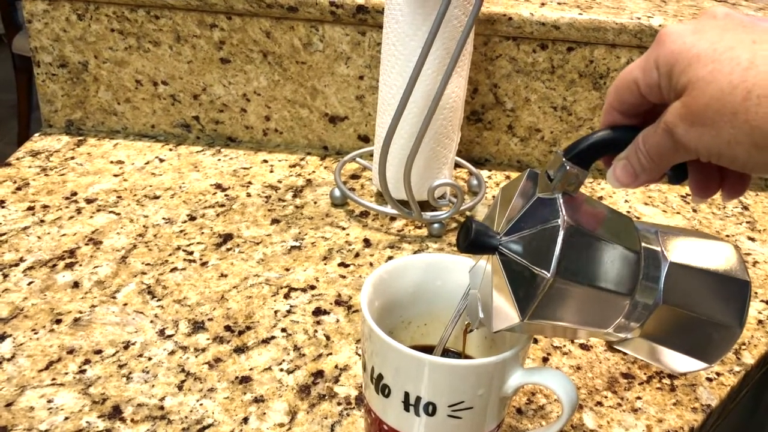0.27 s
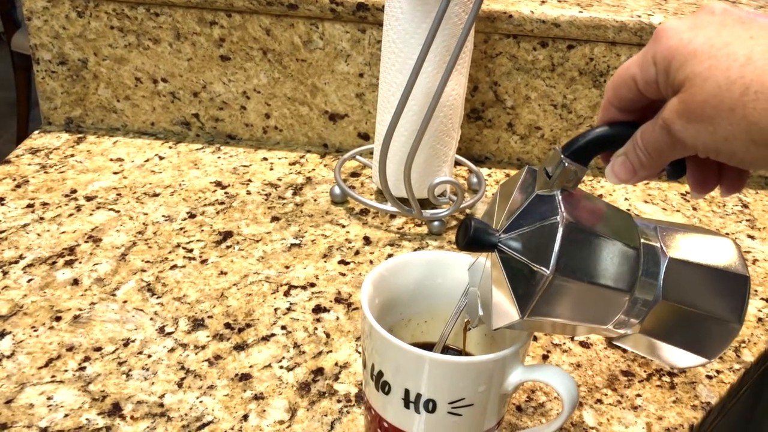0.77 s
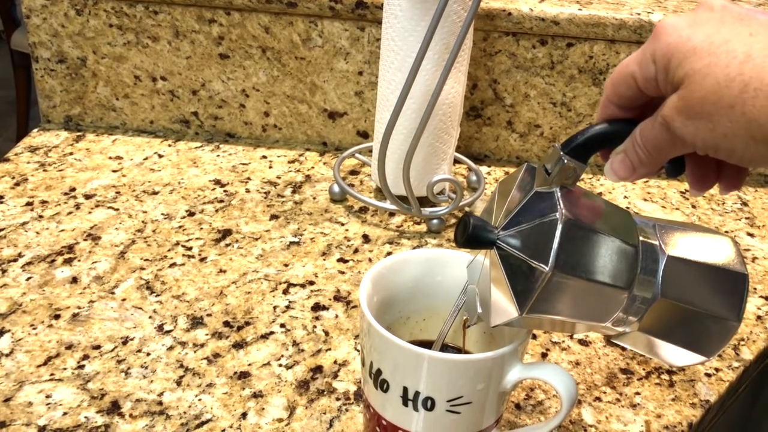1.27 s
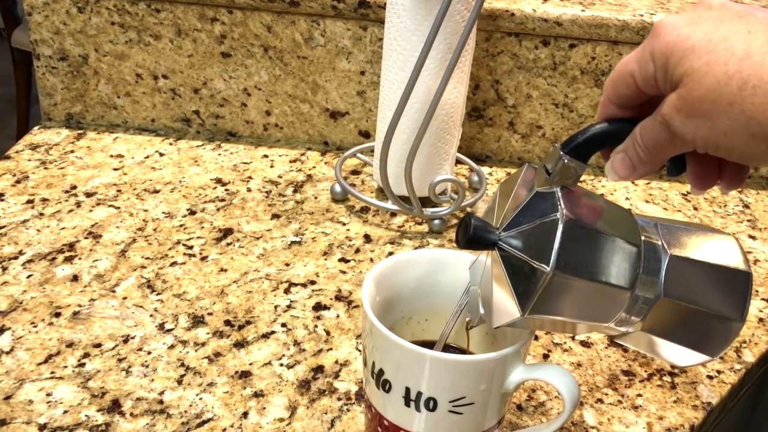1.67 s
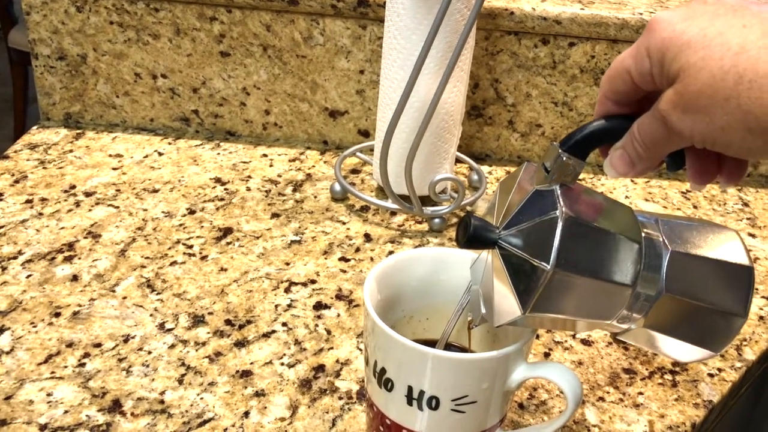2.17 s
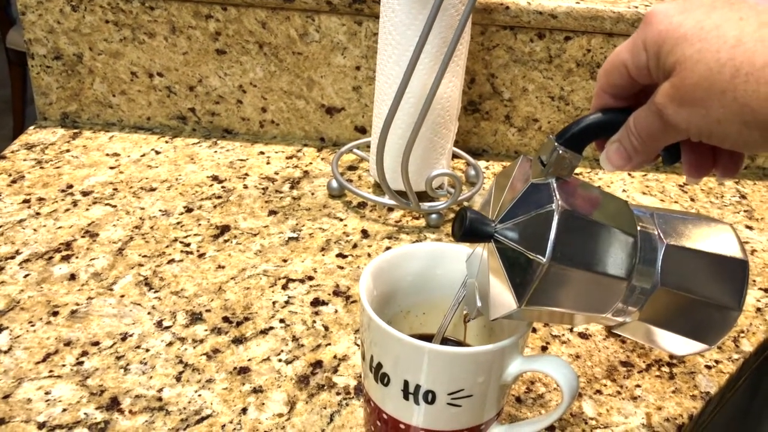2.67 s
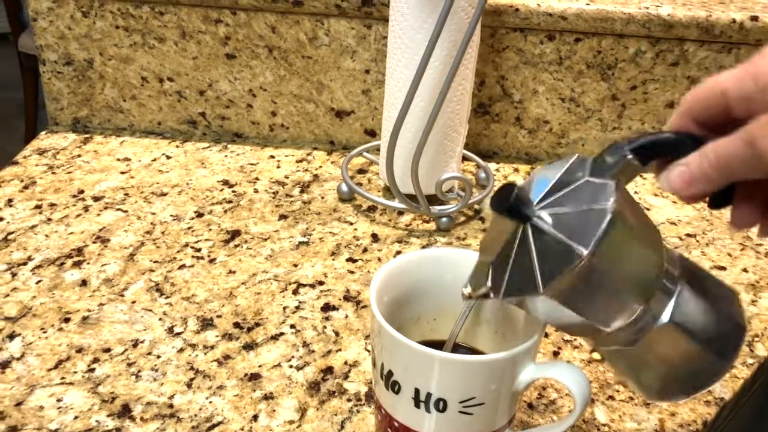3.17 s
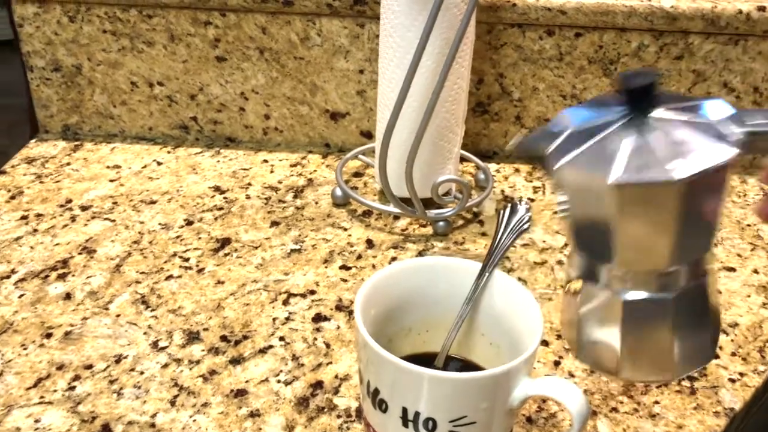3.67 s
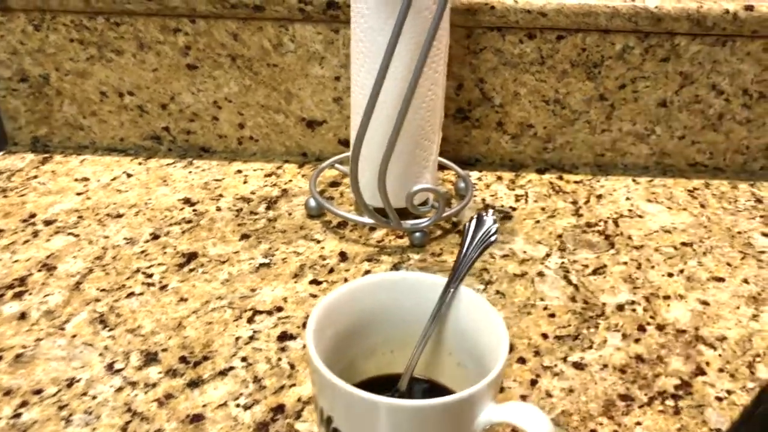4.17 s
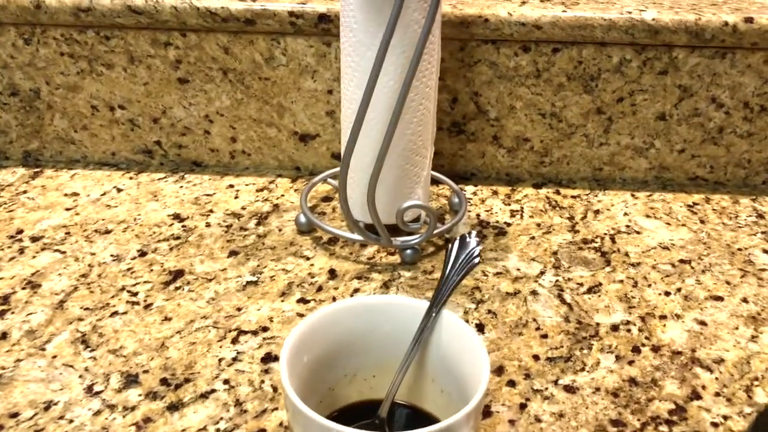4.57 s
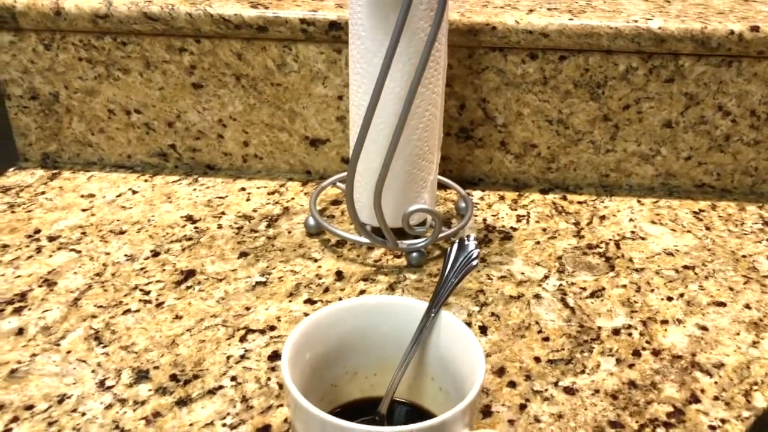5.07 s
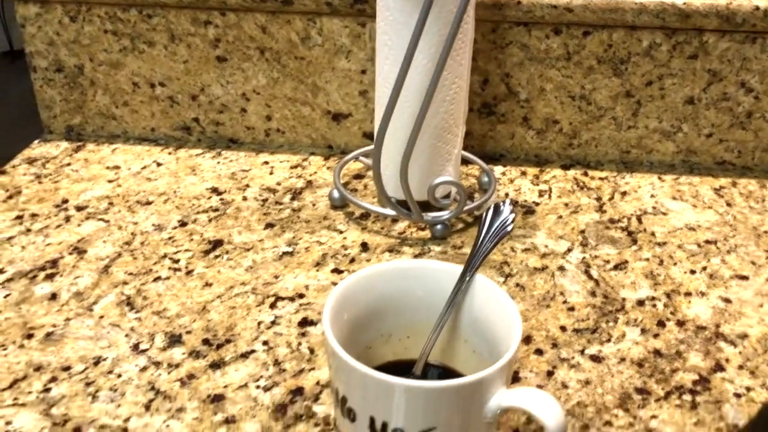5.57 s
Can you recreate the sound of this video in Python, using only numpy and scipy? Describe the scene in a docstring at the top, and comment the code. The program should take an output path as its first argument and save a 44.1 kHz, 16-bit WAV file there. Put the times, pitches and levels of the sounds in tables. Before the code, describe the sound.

Coffee trickles and plinks into a ceramic mug with sharp spits, a spoon clinks twice, then a tap spurts and a metal pot clacks down in a sink.

```python
"""Coffee drops plink into a ceramic mug and spit sharply on a hot metal spout, over a kitchen's low hum.
Bubbles ring at a rising pitch in the mug, and vapour bursts are short runs of ticks. The pour ends, the
pot is lifted away with light bumps, and the spoon in the mug shifts twice, ringing the ceramic modes.
A tap spurts into the sink and runs as shaped noise; the pot is set down there with a clack, its body and
the basin ringing as decaying sines, while the jet hisses on it. The hum swells from late in the pour on."""
import sys
import numpy as np
from scipy import signal
from scipy.fft import rfft, irfft, next_fast_len
from scipy.io import wavfile

SR = 44100
rng = np.random.default_rng(int(sys.argv[2]) if len(sys.argv) > 2 else 0)


def unload_wav(signal):
    """Save mono or channel-first audio to the path in sys.argv[1] as 16-bit WAV at rate SR, clipped to [-1, 1]."""
    wavfile.write(
        sys.argv[1],
        SR,
        np.round(np.clip(np.atleast_2d(signal).T, -1, 1) * 32767).astype(np.int16),
    )


N = 256220
TIME = np.arange(N) / SR

# All levels are relative. A colour is a noise spectrum; its level is a density.

# larger drops in the mug: (t/s, bubble f/Hz, bubble level/dB, splash level/dB)
DROPS = [(0.0418, 2080, -49, -53), (.138, 2100, -55.5, -56), (0.2407, 1980, -45, -35),
         (.278, 2490, -37, -46), (.3002, 3760, -43.5, -47.5), (.33, 2130, -51, -48),
         (.3683, 2390, -41, -51), (0.4232, 2470, -42.5, -54), (.4609, 2650, -48.5, -49),
         (0.4976, 2060, -54, -43), (.567, 2100, -50.5, -50), (0.6099, 1730, -42.5, -55),
         (.6668, 1970, -43.5, -42), (0.6825, 2130, -56, -50), (.9026, 2080, -50.5, -53),
         (0.9137, 2260, -49.5, -41), (.9467, 2120, -51.5, -54), (0.985, 2600, -46, -53.5),
         (.9956, 2620, -41.5, -54), (1.046, 2170, -53.5, -49), (1.0748, 2640, -42.5, -46),
         (1.1437, 2100, -48, -51), (1.155, 2130, -62, -46.5), (1.255, 2130, -61, -53),
         (1.275, 2440, -53.5, -41), (1.483, 4120, -54, -53.5), (1.7945, 1960, -73, -49.5),
         (1.8045, 4090, -59, -46.5), (1.9038, 4100, -60, -51.5), (1.915, 3830, -49, -52),
         (1.9607, 2260, -44, -49), (2.0662, 2500, -41, -54), (2.1208, 2400, -39, -48),
         (2.1527, 3670, -53, -58), (2.2034, 2520, -43.5, -53), (2.2112, 2410, -50, -54),
         (2.2905, 3770, -47, -50.5), (2.4755, 2590, -43.5, -50)]
# slap of a drop on the surface: (f/Hz, level/dB)
SPLASH_COLOUR = [(1200, -5), (2100, -10), (2700, -16), (3200, -8), (3900, 4), (4800, -8.5), (7100, 2.5),
                 (8200, -5.5), (9300, 2), (11000, -1.5), (12000, -9), (15500, -2.5)]
# air cavity of the mug: (f/Hz, level/dB, t60/s)
CAVITY_MODES = [(2060, -10.5, 0.016), (2650, -9.5, 0.04)]
DROPLET_HZ = 7150  # mean ping of the tiny bubble that each slap leaves
POUR_S = 2.9  # the stream runs until then
# surges of the stream churn the coffee: (t/s, time from onset to fade/s, level/dB)
SURGES = [(0, 0.58, -59), (1.078, 0.19, -64), (2.51, 0.19, -59.5)]
WASH_COLOUR = [(60, -17), (100, 4.5), (150, -8.5), (300, 2), (450, -4.5), (650, -25)]  # churning coffee: (f/Hz, level/dB)
SURGE_RISE_S, SURGE_FADE_DB_PER_S = 0.079, 49

# coffee wets the hot spout and boils: (t/s, time from onset to fade/s, level/dB, tick rate/Hz, fade/dB per s)
SIZZLES = [(0.073, 0.12, -56.5, 125, 260), (0.266, 0.28, -55, 335, 280), (2.363, 0.068, -52, 310, 900),
           (2.453, 0.092, -53, 280, 300), (2.573, 0.14, -59, 360, 170)]
# sharp spits on the hot metal: (t/s, peak level/dB)
SPITS = [(.036, -29), (.060, -19.5), (.099, -24.5), (.109, -25), (.134, -28), (.151, -28), (.176, -18),
         (.237, -31), (.349, -27), (.510, -21.5), (.663, -33), (2.372, -29.5), (2.427, -21.5), (2.434, -31),
         (2.465, -26), (2.485, -17), (2.547, -27.5)]
# short puffs of steam: (t/s, level/dB, length/s)
PUFFS = [(0.039, -50.5, 0.029), (0.165, -47, 0.016), (2.479, -45, 0.011)]
# ring of a sizzle tick, then of a spit: (f/Hz, level/dB, t60/s)
TICK_MODES = [(2600, -16.5, 0.0018), (6900, -7.5, 0.0019), (12250, 1, 0.00096), (14300, 1.5, 0.0008)]
SPIT_MODES = [(2100, -19, 0.0048), (3430, -22, 0.0032), (6830, -8.5, 0.0012), (12400, -2.5, 0.00096),
              (14450, -1, 0.001)]
WETTING_S = 0.008  # rise of each sizzle

# light bumps of handling the pot: (t/s, level/dB, brightness/dB per octave, t60/s)
KNOCKS = [(3.015, -50.5, -1, 0.18), (3.044, -43, -2, 0.095), (3.062, -47, -1.5, 0.086),
          (5.197, -32, 2.5, 0.049), (5.249, -43.5, -3, 0.06)]
KNOCK_COLOUR = [(150, -10), (250, -1), (500, -11), (800, -7), (1100, -10.5), (1900, -13.5), (3000, -22),
                (5000, -25.5), (8500, -21.5), (14000, -43)]  # bump: (f/Hz, level/dB)
# resonances of the handled pot: (f/Hz, width/Hz, lift/dB)
KNOCK_PEAKS = [(900, 49, 14), (1310, 43, 3), (1490, 47, 6), (2248, 94, 13.5), (3730, 140, 6)]
# spoon against the mug: (t/s, ring level/dB, knock level/dB, brightness/dB per octave)
CLINKS = [(3.8364, -17.5, -25.5, 1.5), (3.852, -25, -34, -2.5), (3.857, -42, -37.5, -5),
          (4.361, -24, -32.5, 0)]
CLINK_COLOUR = [(200, -21), (390, -0.5), (600, -5), (750, -1.5), (1050, 4.5), (1280, -7), (1600, -2),
                (2100, -15), (3800, -7), (4730, -12.5), (6820, -14.5), (10200, -13), (11700, -26),
                (16000, -26)]  # contact noise of the spoon: (f/Hz, level/dB)
# mug and spoon: (f/Hz, level/dB, t60/s)
MUG_MODES = [(1020, -21.5, 0.069), (1570, -20, 0.052), (3090, -32, .2), (3770, -23, 0.22),
             (4320, -25, 0.11), (5290, -32, 0.14), (6370, -23.5, 0.06), (6960, -21, 0.07),
             (7700, -26, 0.13), (8600, -36, .18), (10000, -24, 0.12), (13320, -28, 0.08)]

TAP_OPEN_S = 4.797
SPURT_DB, SPURT_S, SPURT_RISE_S, SPURT_FADE_DB_PER_S = -35.5, 0.09, 0.0014, 245  # first slug of water
DRUMMING_DB = -59  # steady flow on the basin
SPURT_COLOUR = [(50, 1), (100, -2), (200, -14), (420, -5.5), (720, 3), (1550, -3.5), (2300, -13),
                (3400, -17.5), (4000, -21.5), (4400, -15), (5300, -21.5), (6200, -25), (12000, -32)]  # water drumming on the basin: (f/Hz, level/dB)
# resonances of the basin under the water: (f/Hz, width/Hz, lift/dB)
BASIN_PEAKS = [(125, 17, 13), (278.5, 29, 20.5), (529, 15, 14), (770, 38, -1), (1476, 32, 7.5),
               (1929, 39, 11), (2277, 46, 15.5), (2790, 24, 13), (4420, 80, 8.5), (5320, 58, 14)]
# pot landing in the sink: (t/s, clack level/dB, boom level/dB)
LANDING = [(5.4106, -26.5, -19), (5.4143, -15.5, -3), (5.427, -23.5, -3.5), (5.442, -17, 1)]
LANDING_COLOUR = [(35, -38), (60, -24), (113, -23), (250, -6), (448, -25), (527, -11), (1090, -15.5),
                  (1550, -15.5), (1700, -18.5), (2520, -13.5), (2900, -23), (8320, -15.5), (11300, -26),
                  (14200, -20.5), (16000, -35)]  # noise of each contact: (f/Hz, level/dB)
# sink basin, then pot body: (f/Hz, level/dB, t60/s)
BASIN_MODES = [(75.4, -37, 0.4), (109, -32, 0.23), (131.3, -23, 0.46), (230.4, -31.5, 0.23),
               (276, -35.5, 0.27), (339, -40.5, 0.29), (520, -26.5, 0.22), (543.6, -34, 0.47),
               (767, -37, 0.34)]
POT_MODES = [(1525, -9, 0.13), (2300, -24, 0.15), (2420, -13.5, 0.13), (3120, -16.5, 0.22),
             (3900, -11.5, 0.15), (7080, -10, .12), (7820, -8, 0.058), (8470, -1, 0.056), (13500, -10, .04)]
SPRAY_DB, SPRAY_RISE_S = -51, 0.22  # the spray builds up as the tap draws air
# the jet strikes the pot, first grazing it, then full on: (t/s, rise/s, level/dB, fade/dB per s)
JET_HITS = [(5.26, 0.036, -53, 148), (5.43, .16, -36.5, 16.5)]
# aerated spray, then jet on the pot: (f/Hz, level/dB)
SPRAY_COLOUR = [(710, -34), (1200, -9), (1320, -34), (1560, -18), (1700, -11), (2450, -7), (2830, -10.5),
                (6580, -3.5), (10900, -7.5), (15000, -4), (16000, 0)]
JET_COLOUR = [(590, -46), (1000, -15), (1470, -16), (1710, -17), (1870, -4.5), (2030, -6.5), (2650, -8.5),
              (2910, -13), (3580, -17), (5070, 0), (5570, -3.5), (6700, 1.5), (11000, -10.5), (14900, -6.5),
              (16000, -10)]

# ventilation noise, then faint hiss: (f/Hz, level/dB)
AIR_COLOUR = [(25, -37), (45, -6.5), (80, 3.5), (110, -2), (200, -5), (330, -4.5), (400, -11), (520, -8.5),
              (630, -14.5), (720, -1.5), (900, -2.5), (1080, -11), (1300, -21), (2000, -39)]
HISS_COLOUR = [(710, -33), (1200, -7), (1890, -4.5), (2090, -8.5), (2430, -7.5), (3660, -11), (5410, -15.5),
               (5900, -16.5), (6580, -14), (7820, -17), (16000, -20.5)]
# faint whistles in the hiss: (f/Hz, width/Hz, lift/dB)
HISS_PEAKS = [(5380, 300, 7), (6590, 110, 6.5), (9700, 200, 1.5)]
AIR_DB, HISS_DB = -54.5, -65.5
HUM_HZ, HUM_DB = 132.6, -68  # means at the start
HUM_SWELL_DB, HUM_SWELL_FROM_S, HUM_SWELL_TO_S = 17.5, 2.44, 5.1
KITCHEN_T60_S = 0.54
CUTOFF_HZ = 16000


def drops(bubble_db=8, droplet_db=5, splash_db=7, bubble_t60=0.016, droplet_t60=0.0086,
          splash_t60=0.0078, rise_per_s=3, swell_s=0.00039, droplet_spread=0.017):
    """Bubble resonance: a slap leaves a tiny bubble and a larger one of rising pitch; the cavity answers."""
    out, t = np.zeros(N), TIME[:SR // 20]
    size = len(t)
    for s, hz, ring_db, slap_db in DROPS:
        cycles = hz * t * (1 + rise_per_s * t)
        bubble = np.sin(2 * np.pi * cycles) * dying(bubble_t60, size)
        cavity = struck(CAVITY_MODES, spread_db=2.5, size=size, blur=0.026)
        droplet_hz = DROPLET_HZ * (1 + droplet_spread * rng.standard_normal())
        droplet = from_db(droplet_db) * np.sin(2 * np.pi * droplet_hz * t) * dying(droplet_t60, size)
        splash = from_db(splash_db) * noise(SPLASH_COLOUR, size=size, tilt_db=0.4) * dying(splash_t60, size)
        ring = from_db(ring_db + bubble_db) * (bubble + cavity)
        slap = from_db(slap_db) * (splash + droplet)
        add(out, s, (ring + slap) * swelling(swell_s, size))
    return out


def trickle(level_db=-15, tick_db=-7, bubble_db=-10, pitch_spread=0.18, bubble_t60=0.016,
            crowd_s=0.14, range_db=9, count=456):
    """Clustered impacts: tiny drops crowd each larger one, scaled to it; each ticks and rings bubble and cavity."""
    out, size = np.zeros(N), SR // 40
    for k, (late, heavy, pitch) in enumerate(rng.random((count, 3))):
        s, hz, ring_db, _ = DROPS[k % len(DROPS)]
        tick = from_db(tick_db) * noise(SPLASH_COLOUR, size=size, tilt_db=-8) * dying(0.0056, size)
        bubble_hz = hz * (1 + pitch_spread * (2 * pitch - 1.4))
        cavity = 2 * struck(CAVITY_MODES, spread_db=1.5, size=size, blur=0.085)
        bubble = struck([(bubble_hz, bubble_db, bubble_t60)], spread_db=0, size=size)
        gain = from_db(ring_db + level_db + range_db * heavy ** 3)  # few are heavy
        add(out, s + (late - 0.27) * crowd_s, gain * (tick + cavity + bubble))
    return out


def spatter(level_db=-61, range_db=11, tilt_db=-1, t60=0.0082, count=30):
    """Random impacts: fine droplets tick on the surface at uneven intervals all through the pour."""
    out, size = np.zeros(N), SR // 25
    for k, (late, heavy) in enumerate(rng.random((count, 2))):
        tick = noise(SPLASH_COLOUR, size=size, tilt_db=tilt_db) * dying(t60, size)
        add(out, POUR_S * (k + late) / count, from_db(level_db + range_db * heavy ** 2) * tick)
    return out


def wash():
    """Turbulence: the stream churns softly in the coffee, as low noise under surging envelopes."""
    surges = sum(from_db(db) * envelope(s, SURGE_RISE_S, length, SURGE_FADE_DB_PER_S)
                 for s, length, db in SURGES)
    return surges * noise(WASH_COLOUR)


def sputter(spit_db=-1, steam_db=-10, jitter=0.19, uneven_db=4):
    """Boiling: vapour bursts from under the coffee in near-regular runs of ticks, with spits and puffs."""
    out, steam = np.zeros((2, N))
    tick = struck(TICK_MODES, spread_db=1.5, size=SR // 200)
    hiss = rms_one(np.convolve(rng.standard_normal(N), tick)[:N])
    for s, length, db, ticks_per_s, fade in SIZZLES:
        # a burst falls wherever the count of whole cycles steps up
        cycles = np.floor(np.cumsum(ticks_per_s * (1 + jitter * drift(300))) / SR)
        bursts = np.diff(cycles, prepend=0) * from_db(uneven_db * rng.standard_normal(N))
        ticks = rms_one(np.convolve(bursts, tick)[:N])
        out += from_db(db) * envelope(s, WETTING_S, length, fade) * (ticks + from_db(steam_db) * hiss)
    for s, db in SPITS:
        spit = struck(SPIT_MODES, spread_db=4, size=SR // 100)
        add(out, s, from_db(db + spit_db) * spit / np.abs(spit).max())
    for s, db, length in PUFFS:
        add(steam, s, from_db(db) * signal.windows.tukey(max(int(length * SR), 2)))
    return out + steam * hiss


def knocks():
    """Impact: the handled pot bumps briefly, each contact a decaying noise with its own brightness."""
    out = np.zeros(N)
    for s, db, tilt_db, t60 in KNOCKS:
        bump = noise(KNOCK_COLOUR, size=SR // 2, tilt_db=tilt_db, peaks=KNOCK_PEAKS)
        add(out, s, from_db(db) * bump * dying(t60))
    return out


def spoon(contact_t60=0.025, swell_s=0.00032):
    """Modal ringing: the spoon slips, knocks and rings the ceramic; the rebounds are duller."""
    out = np.zeros(N)
    for s, ring_db, knock_db, tilt_db in CLINKS:
        contact = noise(CLINK_COLOUR, size=SR // 2, tilt_db=tilt_db) * dying(contact_t60)
        ring = struck(MUG_MODES, spread_db=2, blur=0.0104)
        add(out, s, (from_db(knock_db) * contact + from_db(ring_db) * ring) * swelling(swell_s))
    return out


def spurt(lumpy_db=2, slap_db=-12):
    """Forced resonance: a first slug of water thumps and drums on the basin, then the flow turns soft."""
    slug = from_db(SPURT_DB) * envelope(TAP_OPEN_S, SPURT_RISE_S, SPURT_S, SPURT_FADE_DB_PER_S)
    flow = from_db(DRUMMING_DB) * envelope(TAP_OPEN_S, SPURT_RISE_S, N / SR, 0)
    lumps = from_db(lumpy_db * drift(250))
    out = np.maximum(slug, flow) * lumps * noise(SPURT_COLOUR, peaks=BASIN_PEAKS)
    add(out, TAP_OPEN_S, from_db(slap_db) * struck(BASIN_MODES, spread_db=2.5))
    return out


def landing(clack_t60=0.075, ring_db=-2, boom_blur=0.0098):
    """Impact of two bodies: the pot meets the basin edge first and rocks flat; both ring in their modes."""
    out = np.zeros(N)
    for s, db, boom_db in LANDING:
        contact = noise(LANDING_COLOUR, size=SR // 2) * dying(clack_t60)
        pot = from_db(ring_db) * struck(POT_MODES, spread_db=2, blur=0.0071)
        basin = struck(BASIN_MODES, spread_db=2.5, blur=boom_blur)
        add(out, s, from_db(db) * (contact + pot) + from_db(boom_db) * basin)
    return out


def tap(flutter_db=0.8, swirl_db=2, swirl_rate=16):
    """Turbulent flow: aerated spray, then the jet hissing on the pot; the shifting film swirls the colour."""
    spray = from_db(SPRAY_DB) * envelope(TAP_OPEN_S, SPRAY_RISE_S, N / SR, 0)
    jet = sum(from_db(db) * envelope(s, rise, rise, fade) for s, rise, db, fade in JET_HITS)
    flutter = from_db(flutter_db * drift(200))
    hiss = spray * noise(SPRAY_COLOUR) + jet * flutter * noise(JET_COLOUR)
    edges = np.geomspace(1000, 16000, 13)  # twelve bands, Hz, each drifting in level
    swirl = sum((from_db(swirl_db * drift(swirl_rate)) - 1) * band(hiss, low, high)
                for low, high in zip(edges, edges[1:]))
    return hiss + swirl


def background(waver_db=3.5, wander_hz=3):
    """Stationary noise and a modulated tone: ventilation, faint hiss and a wavering low hum that swells."""
    swell = np.interp(TIME, [HUM_SWELL_FROM_S, HUM_SWELL_TO_S], [0, 1])
    hum_db = HUM_DB + HUM_SWELL_DB * swell + waver_db * drift(12)
    phase = 2 * np.pi * np.cumsum(HUM_HZ + wander_hz * drift(14)) / SR
    hum = from_db(hum_db) * np.sqrt(2) * np.sin(phase)
    air = from_db(AIR_DB) * noise(AIR_COLOUR)
    return air + from_db(HISS_DB) * noise(HISS_COLOUR, peaks=HISS_PEAKS) + hum


def enclosed(x, echo_db, echo_t60):
    """Multiple reflection: sound bounces between the close walls of a vessel as dense decaying echoes."""
    t = TIME[:SR // 20]
    echoes = rng.standard_normal(len(t)) * dying(echo_t60, len(t)) * (t > 0.0005)
    return x + from_db(echo_db) * signal.fftconvolve(x, echoes / np.linalg.norm(echoes))[:N]


def kitchen(x, treble_db=-5, treble_t60=0.47):
    """Reverberation: a diffuse room tail of decaying noise whose treble dies sooner."""
    low, high = rng.standard_normal((2, SR // 2))
    bass = band(low, 44, 3460) * dying(KITCHEN_T60_S)
    treble = from_db(treble_db) * band(high, 2600, 15000) * dying(treble_t60)
    tail = (bass + treble) * swelling(0.0029) / np.linalg.norm(dying(KITCHEN_T60_S))
    return signal.fftconvolve(x, tail)[:N]


def struck(modes, spread_db, size=SR // 2, blur=0):
    """Modal synthesis: decaying sines of varied strength; blur splits each into three close, beating ones."""
    out = 0
    for k, (hz, db, t60) in enumerate(modes):
        split = hz * (1 + blur * rng.standard_normal((3, 1)))
        ring = np.sin(2 * np.pi * split * TIME[:size]).mean(axis=0)
        gain = (-1) ** k * from_db(db + rng.normal(0, spread_db))  # polarity alternates
        out = out + gain * dying(t60, size) * ring
    return out


def noise(colour, size=N, tilt_db=0, peaks=()):
    """Spectral shaping: steady noise follows a colour, tilted per octave and lifted at resonances; rms 1."""
    hz, db = np.transpose(colour)
    padded = next_fast_len(size, True)
    f = np.arange(1, padded // 2 + 2) * SR / padded
    level_db = np.interp(np.log(f), np.log(hz), db, left=-120, right=-120)
    gain = from_db(level_db + tilt_db * np.log2(f))
    for centre, width, lift_db in peaks:
        gain = gain * (1 + (from_db(lift_db) - 1) / (1 + (2 * (f - centre) / width) ** 2))
    return rms_one(irfft(rfft(rng.standard_normal(padded)) * gain, padded)[:size])


def envelope(start_s, attack_s, length_s, fade_db_per_s):
    """Amplitude contour: linear attack, hold until length_s after the start, then an even fade in dB."""
    t = TIME - start_s
    fade_db = np.minimum(fade_db_per_s * np.maximum(t - length_s, 0), 200)
    return np.clip(t / attack_s, 0, 1) * from_db(-fade_db)


def dying(t60, size=SR // 2):
    """Exponential decay: the level falls 60 dB in t60 seconds."""
    return from_db(-60 * TIME[:size] / t60)


def swelling(rise_s, size=SR // 2):
    """Exponential build-up towards 1 with time constant rise_s."""
    return 1 - np.exp(-TIME[:size] / rise_s)


def drift(rate):
    """Slow random modulation: straight lines between random points, rate of them per second; rms 1."""
    steps = rng.standard_normal(4000)
    return rms_one(np.interp(TIME * rate, np.arange(len(steps)), steps))


def band(x, low_hz, high_hz):
    """Band limiting: Butterworth band-pass."""
    edges = [low_hz, min(high_hz, 0.48 * SR)]
    sos = signal.butter(2, edges, "band", fs=SR, output="sos")
    return signal.sosfilt(sos, x + 1e-18)  # inaudible offset


def from_db(db):
    """Logarithmic level: decibels to amplitude gain."""
    return np.exp(np.asarray(db) * (np.log(10) / 20))


def rms_one(x):
    """Normalisation: scale to unit power."""
    return x / np.sqrt(np.mean(x ** 2) + 1e-20)


def add(out, s, sound):
    """Superposition: mix a sound in at time s."""
    i = max(round(s * SR), 0)
    out[i:i + len(sound)] += sound[:N - i]


def scene(near_wet_db=-12, far_wet_db=-5, bass_cut_hz=62):
    """Distance: the mug is close; the sink is farther and wetter, its thin sheet radiating no deep bass."""
    in_mug = enclosed(drops() + trickle() + spatter(), echo_db=-6, echo_t60=0.027)
    near = in_mug + wash() + sputter() + spoon()
    far = band(knocks() + spurt() + landing(), bass_cut_hz, SR / 2)
    room = kitchen(from_db(near_wet_db) * near + from_db(far_wet_db) * far)
    water = enclosed(tap(), echo_db=-6.5, echo_t60=0.033)
    return (near + far + room + water + background())[None]


def record(dry):
    """Band limiting: a steep elliptic low-pass cuts the top."""
    sos = signal.ellip(10, 0.2, 70, CUTOFF_HZ, fs=SR, output="sos")  # ripple and stop-band depth in dB
    return signal.sosfilt(sos, dry)


dry = scene()
out = record(dry)
unload_wav(out)
```